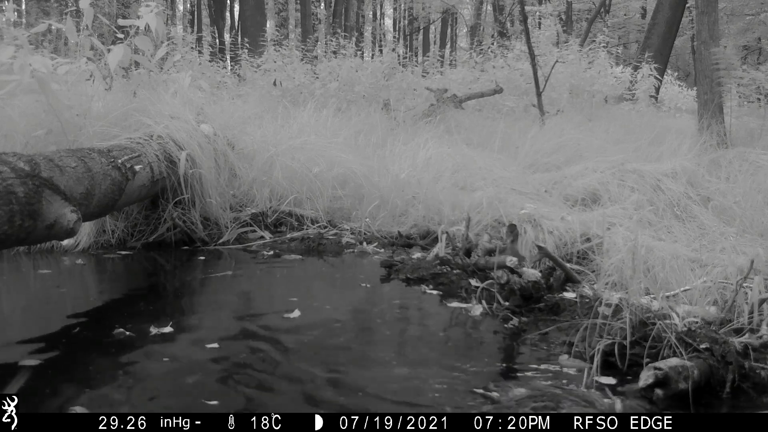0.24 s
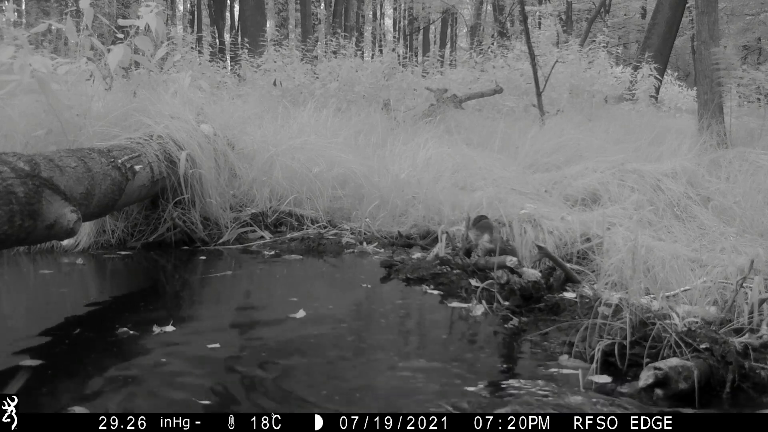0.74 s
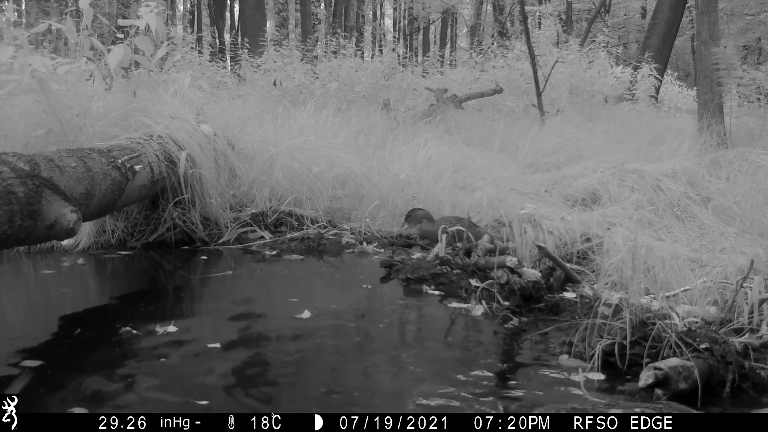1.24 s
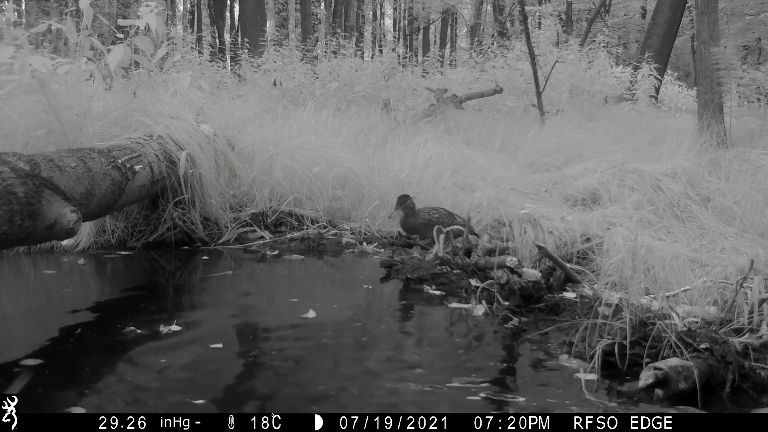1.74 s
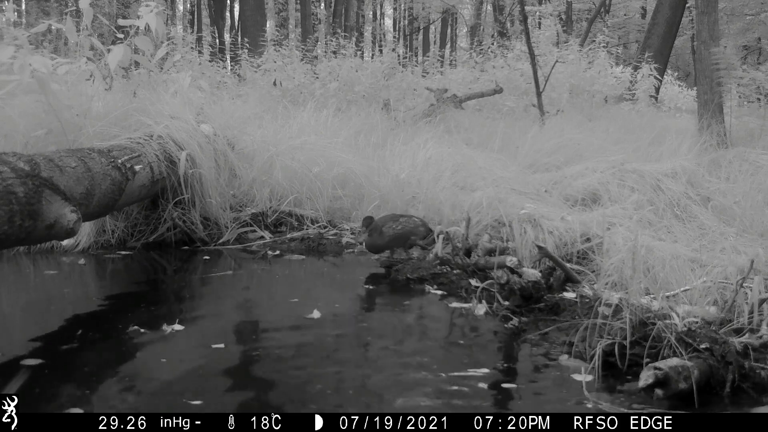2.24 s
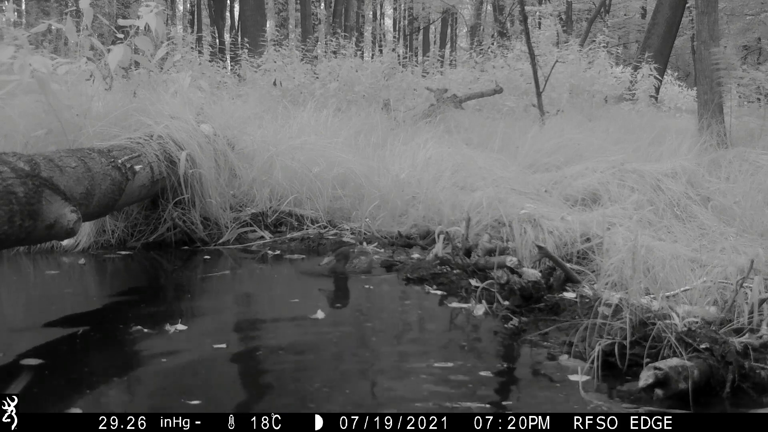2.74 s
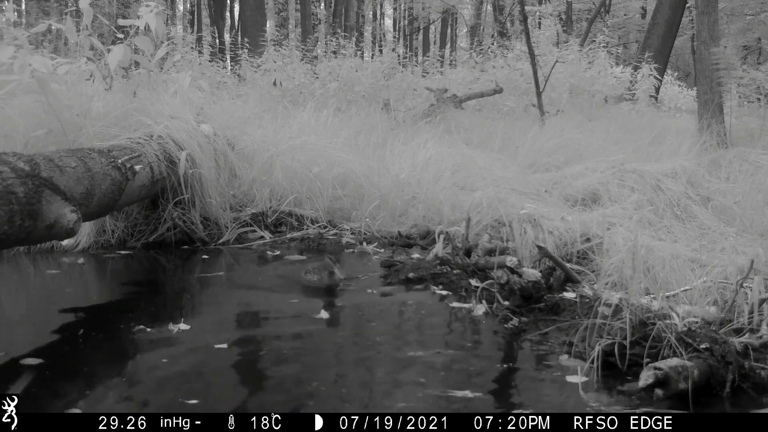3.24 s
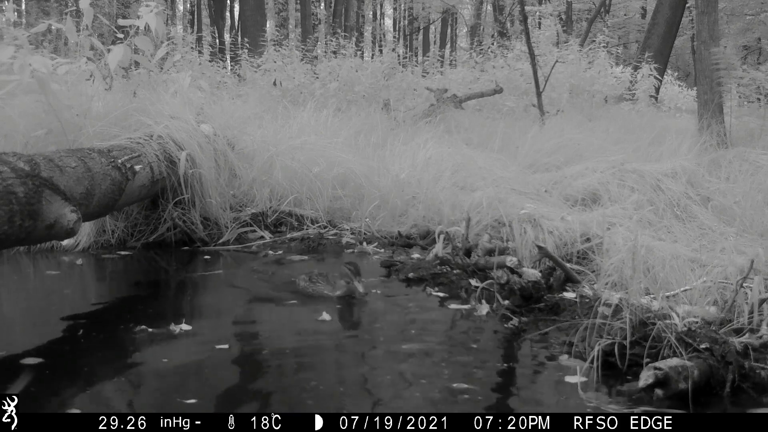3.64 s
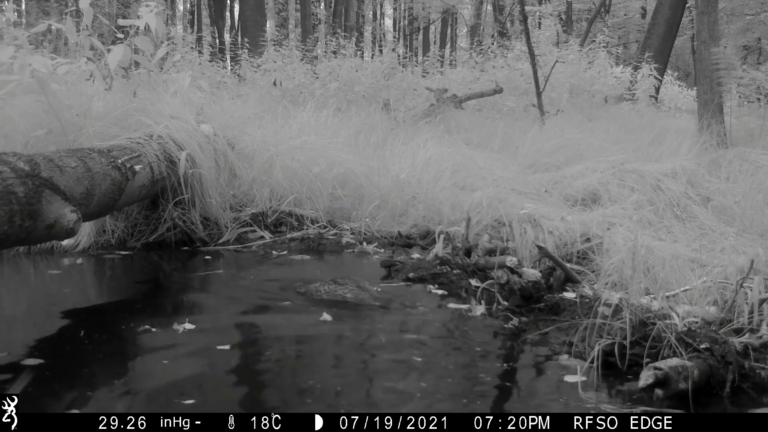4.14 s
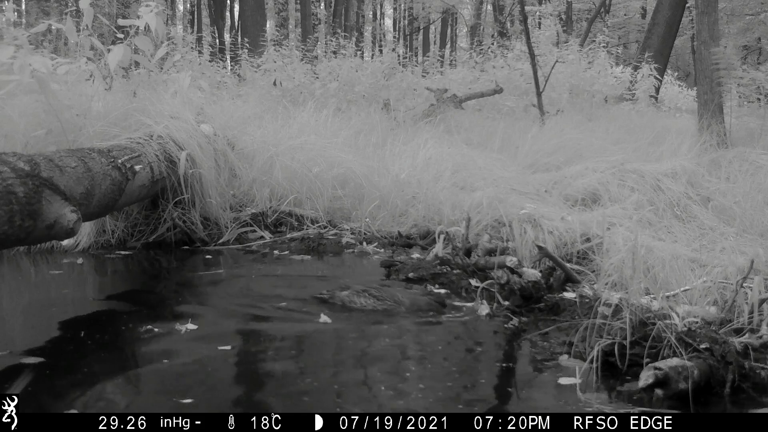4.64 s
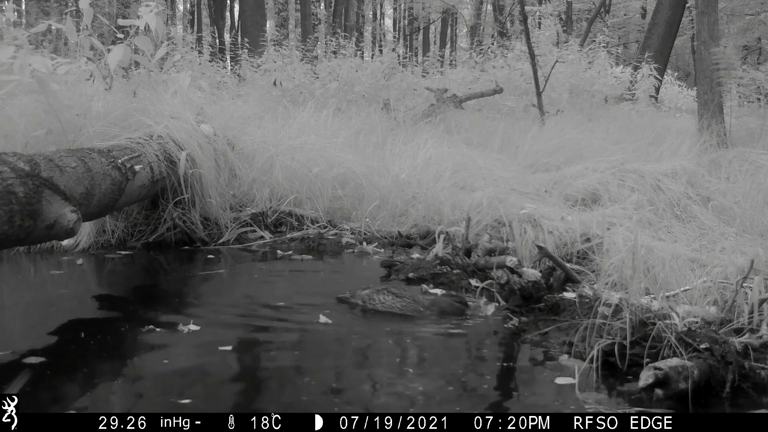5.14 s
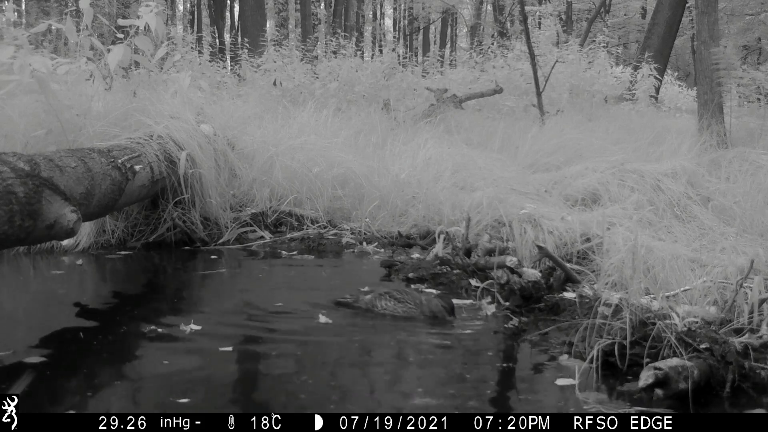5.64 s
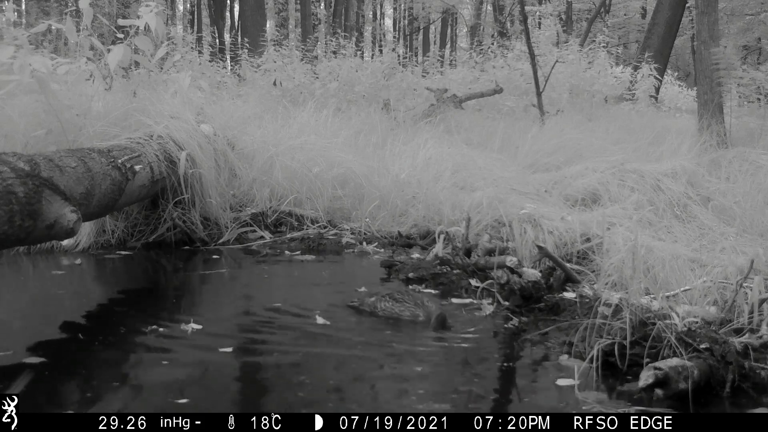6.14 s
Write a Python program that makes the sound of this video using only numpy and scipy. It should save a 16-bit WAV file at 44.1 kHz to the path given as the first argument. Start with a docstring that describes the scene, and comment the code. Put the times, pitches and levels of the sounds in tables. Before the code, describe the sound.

Ducks dabble in a quiet woodland pond with sharp little water smacks, drips and soft peeps, over a faint hum of woods and thin electronic whine.

```python
"""Ducks dabble at the edge of a woodland pond: bills and feet smack the water and leave ringing bubbles.
Each smack is a short ringing tone with grit and a crack; droplets, soft gulps and bright spray join in.
The birds peep and coo softly, as near-pure tones that follow pitch curves, and short echoes surround them.
A steady coloured noise is the woods behind. A camera in a closed box hears it all: the box dulls the
water's treble, and the circuits add hiss and a thin buzzing whine."""
import sys
import numpy as np
from scipy import signal
from scipy.fft import rfft, irfft
from scipy.io import wavfile
from scipy.ndimage import uniform_filter1d

SR = 44100
rng = np.random.default_rng(int(sys.argv[2]) if len(sys.argv) > 2 else 0)


def output_pcm(signal):
    """Save a mono or channel-first signal as 16-bit PCM at the path in sys.argv[1].

    Samples are clipped to [-1, 1] before scaling.
    """
    pcm = np.clip(np.atleast_2d(signal).T, -1, 1) * 32767
    wavfile.write(sys.argv[1], SR, np.round(pcm).astype(np.int16))


N = 282240  # length of the scene in samples


def undb(db):
    """Turn decibels into a plain multiplier."""
    return 10 ** (np.asarray(db) / 20)


def add(out, start_s, x):
    """Mix x into out from the given time, cutting off what runs past the end."""
    i = int(start_s * SR)
    out[i:i + len(x)] += x[:max(len(out) - i, 0)]


def band(x, hz, width_hz):
    """Keep what lies around one pitch: a two-pole resonance, gain 1 at the centre."""
    return signal.lfilter(*signal.iirpeak(hz, hz / width_hz, SR), x)


def double_band(x, hz, width_hz):
    """Pass through the same resonance twice, for steeper sides."""
    return band(band(x, hz, width_hz), hz, width_hz)


def unit(x):
    """Scale to a peak of 1."""
    return x / np.abs(x).max()


def coloured(points):
    """Noise of rms 1 whose spectrum follows the given (Hz, dB) points."""
    hz, db = np.transpose(points)
    f = np.arange(N // 2 + 1) * SR / N
    gain = undb(np.interp(np.log(f + 1), np.log(hz), db))
    x = irfft(rfft(rng.standard_normal(N)) * gain, N)
    return x / x.std()


def woods():
    """The steady murmur of the woods: noise, strongest in the middle pitches."""
    # spectrum of the murmur: pitch_hz [Hz], relative_level_db [dB per Hz]
    murmur_spectrum = [(25, -16), (120, -6), (489, 0.5), (1350, 0.5), (2010, -4), (2580, -3), (2900, -6.5),
                       (3600, -17.5), (4680, -27), (6000, -32), (8000, -47)]
    return undb(-57.5) * coloured(murmur_spectrum)


def whine():
    """A tone that flips between a strong and a weaker, nearly inverted state, ticking at each flip."""
    whine_hz, flip_hz, flip_start_s = 7796.23, 29.7561, .0052  # flip_hz counts full there-and-back cycles
    t = np.arange(N) / SR
    strong = ((t - flip_start_s) * flip_hz) % 1 < .5
    phase = 2 * np.pi * whine_hz * t
    tone = np.where(strong, undb(-73.0) * np.cos(phase), undb(-77.5) * np.cos(phase + 2.5))
    octave = undb(-93.0) * np.cos(2 * phase)
    # one step up or down per flip, softened into a tick
    ticks = double_band(np.diff(1. * strong, prepend=0), 3300, 2200)
    fuzz = band(rng.standard_normal(N), whine_hz, 200)
    return tone + octave + undb(-60.5) * unit(ticks) + undb(-97) * fuzz / fuzz.std()


def smack(db, hz, t60_ms, glide=0.076, rough=0.15, crack=0.23, crack_s=.0004):
    """A short tone that swells quickly and rings a few cycles, rising a little; it peaks 5 ms in."""
    t = np.arange(int(.045 * SR)) / SR - .005
    # a tone ringing 10 ms at 2 kHz swells in 0.88 ms at -37.5 dB
    rise_ms = 0.88 * (t60_ms / 10) ** 0.52 * (hz / 2000) ** -0.33
    rise_ms = rise_ms * np.exp(-.012 * (db + 37.5))
    rise_s = np.clip(rise_ms, .3, 4) / 1000
    t60_s = np.clip(t60_ms, 3, 40) / 1000  # time to fade by 60 dB
    swell, fade = np.exp(-(t / rise_s) ** 2), np.exp(-np.log(1000) * t / t60_s)
    shape = np.where(t < 0, swell, fade)
    tone = np.cos(2 * np.pi * (hz * (t + glide * t ** 2 / t60_s) + rng.random()))
    # torn water surface: noise around the same pitch
    grit = double_band(rng.standard_normal(len(t)), hz, 1200)
    # the surface snaps open just before the peak
    snap = band(rng.standard_normal(len(t)), 2200, 2400) * np.exp(-np.abs(t + rise_s / 2) / crack_s)
    return undb(db) * (shape * (tone + rough * grit / grit.std()) + crack * unit(snap))


def droplets():
    """A random patter of small smacks, stronger while the birds stir the water."""
    # how hard the birds stir the water: time_s [s], droplet_level_db [dB, least peak before filtering]
    stirring = [(0, -57), (.5, -62), (.62, -49), (.7, -50), (.8, -45.5), (.95, -52.5), (1.05, -56.5),
                (1.21, -58.5), (1.32, -59.5), (2.5, -58.5), (2.7, -55), (2.9, -60.5), (4.4, -58.5),
                (4.65, -52.5), (4.9, -58), (5.9, -59), (6.1, -55.5), (6.4, -65)]
    out = np.zeros(N)
    time_s, level_db = np.transpose(stirring)
    for when, size, pitch, ring in rng.random((2000, 4)):
        start_s = when * N / SR
        # the cube keeps most droplets small
        peak_db = np.interp(start_s, time_s, level_db) + 8 * size ** 3
        pitch_hz = 1300 + 1550 * pitch ** .4
        add(out, start_s, smack(peak_db, pitch_hz, 4 + 9 * ring))
    return out


def gulps(glide=0.094):
    """Soft bubbles with no crack: air that swells and fades evenly while its pitch rises."""
    # gulps: middle_s [s], level_db [dB, peak before the box], pitch_hz [Hz], half_length_ms [ms]
    gulp_list = [(0.069, -51.5, 1760, 7.4), (.5965, -41, 2480, 3.3), (0.7208, -21, 1220, 2.7),
                 (0.9106, -36.5, 2600, 2.3), (1.24, -41, 2630, 2.6), (1.6033, -38, 2200, 1.7),
                 (2.312, -55.5, 337, 12), (4.6596, -45, 1420, 4), (4.9286, -42, 2600, 2.4),
                 (5.0368, -50, 620, 4), (5.6114, -43, 2660, 2.2), (6.3389, -51, 880, 3.4)]
    out = np.zeros(N)
    for middle_s, db, hz, half_ms in gulp_list:
        half_s = half_ms / 1000
        t = np.arange(-3 * half_s, 3 * half_s, 1 / SR)
        tone = np.cos(2 * np.pi * (hz * (t + glide * t ** 2 / half_s / 2) + rng.random()))
        add(out, middle_s + t[0], undb(db) * np.exp(-(t / half_s) ** 2) * tone)
    return out


def smacks():
    """Bills and feet hitting the water, with drips and bubbles, each a short ringing tone; many hits are joined
    by a second, higher ring near 2.6 kHz."""
    # smacks: peak_s [s], level_db [dB, tone peak before filtering], pitch_hz [Hz],
    # ring_ms [ms to fade 60 dB, held within 3 to 40]
    smack_list = [(0.383, -43.5, 2370, 15), (0.3972, -44, 1180, 15), (.5125, -34, 2630, 15),
                  (.5537, -42.5, 2070, 47), (.5568, -44, 2720, 23), (.5918, -43.5, 1700, 10),
                  (0.6162, -31, 2280, 16), (.6307, -41, 1530, 18), (.64, -39, 1670, 11),
                  (0.6452, -38, 1490, 5), (.646, -42, 2480, 25), (.6524, -40, 2040, 6),
                  (0.703, -43, 2510, 19),  (0.7145, -14.5, 1580, 6.7), (0.717, -33, 2580, 11),
                  (.7268, -28.5, 1480, 11), (.7273, -39, 2310, 10), (0.734, -41.5, 2210, 10),
                  (0.7485, -21, 1550, 5.8), (.7487, -23.5, 2280, 15), (0.7508, -32.5, 2690, 25),
                  (0.7557, -33.5, 1370, 7.5), (.7562, -35, 2290, 9.1), (.7684, -40, 1150, 8.4),
                  (.7912, -44, 2480, 12), (0.817, -40, 1400, 8.9), (0.7755, -37.5, 1600, 23),
                  (0.802, -40, 2670, 13), (.808, -32, 2320, 5), (.8209, -43, 2640, 34),
                  (0.8213, -35, 1400, 16), (0.8331, -37, 1640, 9), (0.8701, -32, 2250, 16),
                  (0.9003, -26.5, 1860, 13), (.9175, -39, 2750, 6.6), (.9827, -34, 2560, 11),
                  (1.1847, -39, 2300, 4), (1.1905, -42, 2290, 6), (1.1959, -40, 1860, 6),
                  (1.1909, -38.5, 1380, 6.7), (1.207, -41, 2550, 5.4), (1.2247, -38.5, 1290, 20),
                  (1.2265, -43, 2100, 12), (1.4607, -45.5, 2240, 12), (1.5962, -35, 2540, 12),
                  (1.596, -28, 1954, 12), (2.1473, -34, 2700, 3.2), (2.334, -42.5, 2600, 11),
                  (2.4473, -40.5, 1470, 8.2), (2.5668, -43, 2410, 11), (2.6338, -21, 2560, 5.1),
                  (2.6378, -34, 1490, 8.6), (2.6386, -31, 2660, 6), (2.6428, -38, 1350, 21),
                  (2.6476, -34, 2580, 3.6), (2.6474, -39, 1630, 16), (2.6654, -46, 2630, 12),
                  (2.777, -44, 2670, 9), (2.7042, -39, 2150, 5.4), (2.7461, -31.5, 1820, 5),
                  (2.755, -36.4, 2540, 12), (2.763, -23, 2380, 3.5), (2.769, -38, 2670, 10),
                  (2.773, -33, 2580, 7.3), (2.8806, -34.5, 2360, 3.5), (3.1498, -42, 2410, 15),
                  (3.3515, -41.5, 2040, 9.7), (3.3923, -35, 2250, 2.3), (3.5805, -37.5, 2500, 8.6),
                  (3.5803, -34.5, 1720, 3.3), (3.5881, -28.5, 2720, 2.7), (3.617, -41, 2600, 5),
                  (3.6902, -40, 1390, 4.6), (3.913, -33.5, 1900, 15), (3.9204, -39, 1460, 14),
                  (3.935, -33.5, 1640, 11.5), (3.9692, -40, 2450, 4.1), (3.9626, -36.5, 2670, 3.8),
                  (4.0937, -40.5, 2530, 5.1), (4.4175, -37, 2600, 9), (4.5385, -30, 2270, 16),
                  (4.5539, -42.5, 1810, 11), (4.572, -41, 2150, 13), (4.6084, -35.5, 1710, 8.3),
                  (4.6087, -37.5, 2690, 13), (4.6524, -30.5, 2390, 1.2), (4.672, -42.3, 2400, 10),
                  (4.694, -35, 2350, 5), (4.7036, -23.5, 2700, 5.9), (4.7068, -33.5, 1610, 10),
                  (4.709, -32, 2660, 4.2), (4.337, -44, 2510, 6), (4.8177, -43, 2520, 3.9),
                  (4.781, -39, 1140, 12), (4.7828, -36.5, 2640, 8.3), (4.9403, -38.5, 1500, 6.5),
                  (5.1073, -43.5, 2720, 11), (5.1366, -42.5, 2400, 6.7), (5.1984, -43.5, 2870, 12),
                  (5.366, -45.5, 2520, 19), (5.5467, -42.5, 2440, 23), (5.651, -42.5, 2540, 6),
                  (5.393, -39, 2380, 4.4), (5.4598, -41.5, 2650, 6.1), (5.582, -42, 2860, 17),
                  (5.592, -32.5, 2480, 8.4), (5.7046, -40.5, 2620, 8), (5.8932, -37.5, 1950, 2.9),
                  (5.9853, -44, 1960, 10), (6.072, -42, 2440, 6), (5.995, -38.5, 2470, 33),
                  (6.06, -47, 2730, 22), (6.0802, -29, 1710, 3.6), (6.08, -16, 2585, 4.4),
                  (6.085, -40, 2620, 5.3), (6.1048, -32, 2420, 4), (6.1074, -26.5, 2650, 10),
                  (6.117, -34.5, 2560, 21), (6.148, -46, 2500, 10), (6.1703, -47.5, 2600, 10),
                  (6.158, -41, 1800, 3.8), (6.301, -40, 2630, 9.5), (6.322, -37, 2880, 4.1)]
    out = np.zeros(N)
    for peak_s, db, hz, ring_ms in smack_list:
        add(out, peak_s - .005, smack(db, hz, ring_ms))
    return out


def water():
    """All the pond's splashing: smacks and droplets lose their low end, then the box dulls everything."""
    thin = signal.butter(3, 855, "high", fs=SR, output="sos")
    box = signal.butter(7, 3320, fs=SR, output="sos")
    splashes = signal.sosfilt(thin, droplets() + smacks())
    return signal.sosfilt(box, splashes + gulps())


def sing(out, call):
    """Mix in one call: a fluttering tone and any overtones along a pitch curve, faded at both ends."""
    s, hz, *levels_db = np.transpose(call)
    t = np.arange(s[0], s[-1], 1 / SR)

    def smooth(curve):
        """Join the points and round off the corners."""
        return uniform_filter1d(np.interp(t, s, curve), size=260, mode="nearest")

    phase = 2 * np.pi * np.cumsum(smooth(hz)) / SR
    tone = sum(undb(smooth(db)) * np.sin(k * phase) for k, db in enumerate(levels_db, start=1))
    # the voice flutters a little in strength
    flutter = band(double_band(rng.standard_normal(len(t)), 120, 240), 120, 240)
    tone = tone * (1 + 0.15 * flutter / flutter.std())
    fade = np.clip(np.minimum(t - s[0], s[-1] - t) / 0.0011, 0, 1)
    add(out, s[0], np.sqrt(2) * tone * fade)  # the square root makes the levels rms


def peeps():
    """Whistled peeps: single tones without overtones."""
    # one list of points per peep: time_s [s], pitch_hz [Hz], level_db [dB, rms before flutter]
    peep_list = [
        [(.392, 1130, -51), (.406, 1250, -54), (.418, 1640, -53), (.432, 1810, -58)],
        [(.678, 1100, -54), (.685, 1240, -52), (.696, 1358, -46), (.714, 1460, -44)],
        [(.848, 1205, -48), (.856, 1420, -46), (.866, 1635, -38.5), (.875, 1647, -39.5), (.886, 1600, -41),
         (.9, 1210, -48)],
        [(1.32, 1380, -64), (1.33, 1564, -55), (1.343, 1617, -50), (1.36, 1490, -49), (1.38, 1545, -47.5),
         (1.395, 1496, -52), (1.41, 1420, -65)],
        [(1.602, 1570, -59), (1.618, 1367, -59), (1.635, 1260, -62)],
        [(1.655, 1275, -65), (1.683, 1366, -51), (1.693, 1320, -58), (1.7, 1280, -65)],
        [(2.54, 1340, -66), (2.55, 1277, -56), (2.57, 1226, -56.5), (2.6, 1320, -52), (2.612, 1310, -62)],
        [(2.798, 1370, -59), (2.806, 1593, -45), (2.815, 1920, -46.5), (2.823, 1865, -47), (2.835, 1580, -42),
         (2.847, 1410, -47), (2.87, 1470, -46), (2.885, 1413, -47.5), (2.897, 1270, -57)],
        [(3.015, 1127, -62), (3.024, 1450, -54), (3.033, 2010, -55.5), (3.042, 2470, -70)],
        [(4.362, 1410, -63), (4.372, 1653, -48.5), (4.385, 1570, -49.5), (4.396, 1425, -49), (4.405, 1330, -62)],
        [(4.575, 1500, -55), (4.585, 1680, -54), (4.6, 1770, -68)],
    ]
    out = np.zeros(N)
    for call in peep_list:
        sing(out, call)
    return out


def spray(tail=0.22, tail_s=.002):
    """Fine spray, often close to a smack and sometimes on its own: a click with a ragged, bright tail."""
    # spits: start_s [s], level_db [dB, spit peak before the high-pass],
    # mist_db [dB re the spit], fizz_db [dB re the spit]
    spit_list = [(.7125, -65, -18, -8), (.753, -65, -18, -8), (.817, -61, -6, -5), (.899, -50, -25, -7),
                 (.9815, -53, -15, -10), (1.239, -54, -24, -16), (1.516, -64, -12, -8),
                 (2.1458, -56, -24, -11), (2.6333, -46.5, -36, -24), (2.7502, -47.5, -38, -18),
                 (2.772, -49, -26, -16), (3.587, -62, -25, -12), (4.7031, -41.5, -30, -10),
                 (5.3292, -62, -12, -11), (6.0806, -57, -31, -8), (6.105, -64, -24, -8)]
    out, t = np.zeros(N), np.arange(int(.02 * SR)) / SR
    for start_s, db, mist_db, fizz_db in spit_list:
        burst = (t == 0) + tail * rng.standard_normal(len(t)) * np.exp(-t / tail_s)
        # the finest mist reaches highest
        spit = unit(double_band(burst, 3730, 1800))
        fizz = unit(double_band(burst, 5970, 2300))
        mist = unit(double_band(burst, 9800, 4000))
        add(out, start_s, undb(db) * (spit + undb(fizz_db) * fizz + undb(mist_db) * mist))
    return signal.sosfilt(signal.butter(2, 2800, "high", fs=SR, output="sos"), out)


def coo(start_s, length_s, db, bright_db):
    """Points of one coo; its overtones are fullest at the bottom of the dip and thin out as pitch climbs."""
    # the shape every coo shares: share_of_length [0 to 1], pitch_hz [Hz], level_db [dB re the coo's level]
    coo_shape = [(0, 885, -15), (.19, 994, -0.5), (.42, 804, 0), (.62, 804, 0.5), (.79, 890, -1.5),
                 (1, 884, -12)]
    share, hz, rel_db = np.transpose(coo_shape)
    first_db = db + rel_db
    above_hz = hz - 804  # height above the bottom of the dip
    second_db = first_db + bright_db - 4 - 0.1029 * above_hz
    third_db = first_db + bright_db - 7 - 0.0562 * above_hz
    return np.transpose([start_s + length_s * share, hz, first_db, second_db, third_db])


def coos():
    """Low coos: a tone with two overtones whose pitch rises, dips and climbs back."""
    # coos: start_s [s], length_s [s], level_db [dB, rms of the lowest tone],
    # brightness_db [dB added to the overtones]
    coo_list = [(2.911, .103, -50.5, -0.5), (6.234, .088, -51, -0.5)]
    out = np.zeros(N)
    for row in coo_list:
        sing(out, coo(*row))
    return out


def bank(x, t60=0.031, wet_db=-17):
    """Short scattered echoes from the log, the bank and the water, as fading noise after a 3 ms gap."""
    t = np.arange(int(.12 * SR)) / SR
    echo = rng.standard_normal(len(t)) * np.exp(-np.log(1000) * t / t60) * (t > .003)
    return x + undb(wet_db) * signal.fftconvolve(x, echo / np.linalg.norm(echo))[:N]


def scene():
    """Water, birds and spray with their echoes, over the murmur of the woods."""
    near = water() + peeps() + coos() + spray()
    return (bank(near) + woods())[None]


def record(dry):
    """The circuits add hiss and the whine; everything above about 15.7 kHz is cut."""
    hiss = undb(-87.5) * rng.standard_normal(N)
    top_cut = signal.ellip(12, .2, 60, 15720, fs=SR, output="sos")
    return signal.sosfilt(top_cut, dry + hiss + whine())


dry = scene()
out = record(dry)
output_pcm(out)
```